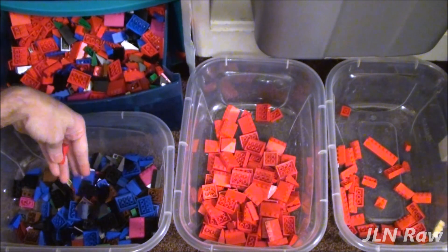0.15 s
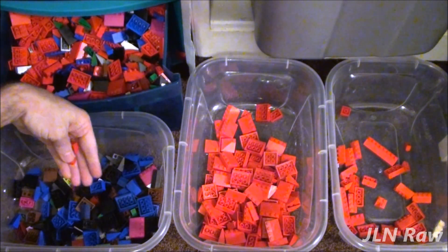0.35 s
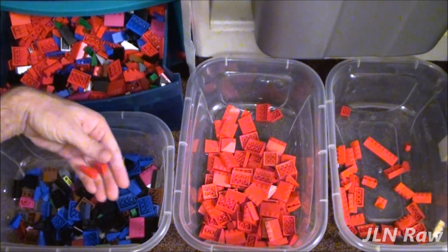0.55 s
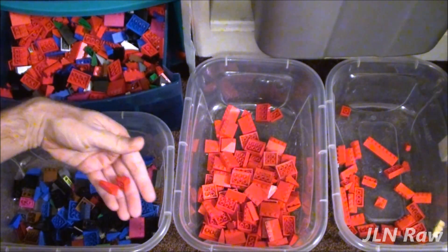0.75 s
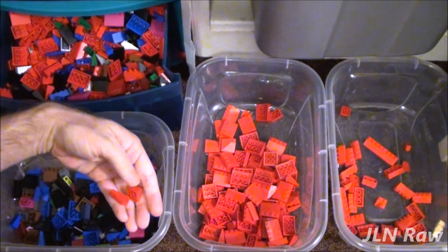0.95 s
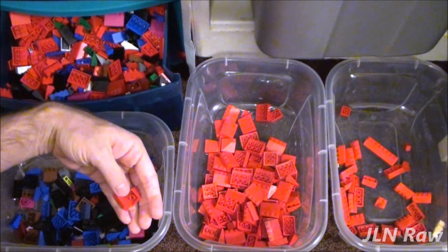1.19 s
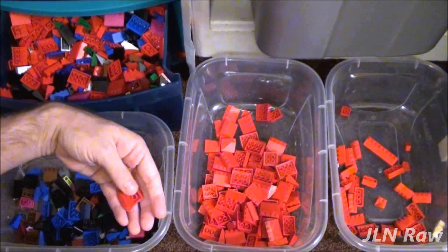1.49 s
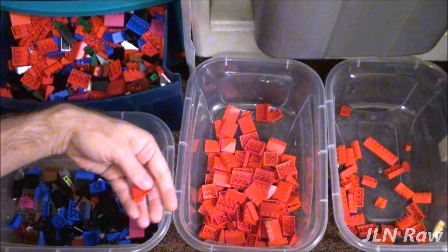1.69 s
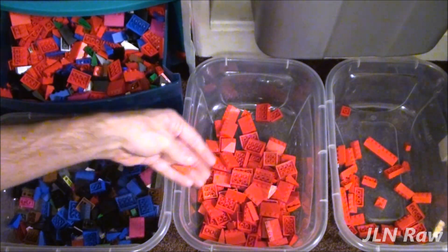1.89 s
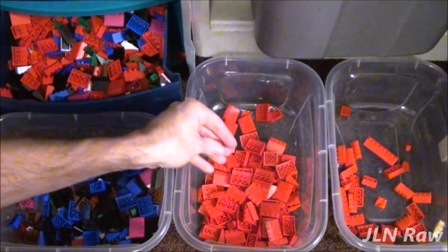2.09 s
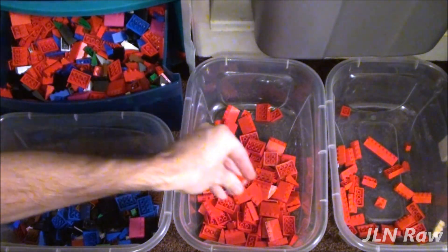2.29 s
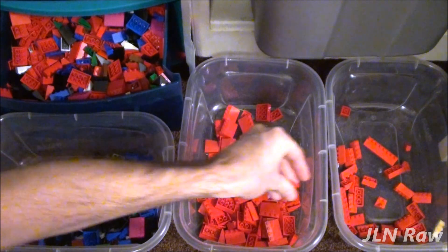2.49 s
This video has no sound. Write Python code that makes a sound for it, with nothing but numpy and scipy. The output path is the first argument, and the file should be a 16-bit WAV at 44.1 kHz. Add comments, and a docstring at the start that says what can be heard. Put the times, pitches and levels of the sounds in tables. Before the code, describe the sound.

After a brief rub and tick of held bricks, a few clack into a hollow bin; sparse finger ticks follow, then another handful patters down and a dry click ends it, heard closely indoors over low hum.

```python
"""Small plastic bricks are sorted by hand into thin plastic bins in a quiet room, over steady hum, whine and hiss.
First held bricks rub and tick with damped rings; then a few fall on a shallow heap, and ticks in the hand follow.
Later the rest drop on a deeper heap in the next bin; a dry click sounds as the hand lifts, then a last rub and tick.
Each falling contact cracks as noise, rings brick modes, drums the bin and jostles three neighbours in the heap."""
import sys
import numpy as np
from scipy import signal
from scipy.fft import rfft, irfft, next_fast_len
from scipy.io import wavfile
from scipy.ndimage import uniform_filter1d

SR = 44100
rng = np.random.default_rng(int(sys.argv[2]) if len(sys.argv) > 2 else 0)


def transcribe(signal):
    """Save signal, clipped to [-1, 1], as a 16-bit WAV file at the path in sys.argv[1]."""
    frames = np.atleast_2d(signal).T
    limited = np.clip(frames, -1, 1)
    pcm = np.round(limited * 32767).astype(np.int16)
    wavfile.write(sys.argv[1], SR, pcm)


N = 116865
TIME = np.arange(N) / SR
SHORT = TIME[:SR // 5]   # time axis of one contact, s


def amp(db):
    """Level to gain: 20 dB is a factor of ten in amplitude."""
    return 10 ** (np.asarray(db) / 20)


def at_hz(points, hz):
    """Logarithmic frequency scale: interpolate a table along it."""
    f, value = np.transpose(points)
    return np.interp(np.log(np.maximum(hz, 1)), np.log(f), value)


def colour(x, points):
    """Minimum-phase filtering: a causal filter of given spectrum that keeps the power of white noise."""
    size = 2 * next_fast_len(N)
    gain = amp(at_hz(points, np.linspace(0, SR / 2, size // 2 + 1)))
    unit_power_gain = gain / np.sqrt(np.mean(gain ** 2))
    # Folding the cepstrum onto positive time makes the filter causal
    cepstrum = irfft(np.log(unit_power_gain))
    cepstrum[1:size // 2] *= 2
    cepstrum[size // 2 + 1:] = 0
    response = np.exp(rfft(cepstrum))
    return irfft(rfft(x, size) * response)[..., :N]


def filtered(x, order, hz, kind):
    """Butterworth filtering: a maximally flat pass band."""
    return signal.sosfilt(signal.butter(order, hz, kind, fs=SR, output="sos"), x)


def add(track, s, sound):
    """Superposition: mix a sound in at a time."""
    i = int(np.clip(s * SR, 0, N - 1))
    track[i:i + len(sound)] += sound[:N - i]


def fade(t60, t=SHORT):
    """Exponential damping: the level falls 60 dB in t60."""
    return np.exp(-np.log(1000) * t / t60)


def ring(hz, t60):
    """Free vibration: one struck mode decays at its own frequency."""
    return np.sin(2 * np.pi * hz * SHORT) * fade(t60)


def burst(t60):
    """High modal density: many close modes dying together act as decaying noise."""
    return rng.standard_normal(len(SHORT)) * fade(t60)


def wall_scatter(x):
    """Multiple reflection: quick echoes between the bin walls, of unit energy."""
    echoes = burst(0.052)
    return signal.fftconvolve(x, echoes / np.sqrt(np.sum(echoes ** 2)))[:N]


def spread(mid, side):
    """Sum and difference stereo: left and right from middle and side."""
    return np.array([mid + side, mid - side])


# Spectral envelope of room rumble and hiss: (f/Hz, relative level/dB)
FLOOR_SPECTRUM = [(15, -44), (25, -20), (43, -16.5), (91, -3.5), (104, -20.5), (122, -12), (209, -7.5),
                  (246, -14.5), (267, -11.5), (297, -13.5), (552, -17), (5140, -24), (5580, -22),
                  (6550, -23.5), (15500, -27)]
# Steady tones of the hum and thin whine: (f/Hz, rms level/dB)
HUM_TONES = [(120, -53.5), (146, -57), (241, -61.5), (8392, -66.5)]
FLOOR_DB, FLOOR_WIDTH = -49.5, 0.72   # noise rms level, side gain
HISS_WIDE_HZ = 255   # the rumble below this comes mostly from the centre


def background():
    """Stationary noise and pure tones: room rumble, hiss, mains hum and a thin steady whine."""
    mid, side = amp(FLOOR_DB) * colour(rng.standard_normal((2, N)), FLOOR_SPECTRUM)
    hum = np.zeros(N)
    for hz, db in HUM_TONES:
        phase = 2 * np.pi * (hz * TIME + rng.random())
        hum += amp(db) * np.sqrt(2) * np.sin(phase)
    side = filtered(side, 1, HISS_WIDE_HZ, "high")
    return spread(mid + hum, FLOOR_WIDTH * side)


# Bricks rub in the fingers: (start t/s, end t/s, level before scatter and colour/dB)
RUBBING_SPELLS = [(0, 0.032, -45), (1.72, 2.168, -57), (2.613, 2.65, -52)]
# Spectral envelope of held bricks, rubbing or ticking: (f/Hz, relative level/dB)
HELD_SPECTRUM = [(300, -31), (1400, -22), (2400, -3.5), (3400, -3.5), (4600, 2), (6300, -1), (8000, -4),
                 (11000, -14.5), (16000, -19)]
RUBS_PER_S = 290   # mean rate of slips


def fumbling():
    """Stick-slip friction: tiny random slips as the fingers shift the bricks."""
    chance = RUBS_PER_S / SR
    slips = (rng.random(N) < chance) * rng.standard_normal(N) / np.sqrt(chance)   # unit mean power
    effort = np.zeros(N)
    for start, end, db in RUBBING_SPELLS:
        effort += amp(db) * ((TIME > start) & (TIME < end))
    return colour(wall_scatter(slips * effort), HELD_SPECTRUM)


# Bricks touching in the hand: (t/s, level/dB, ring f/Hz, ring level relative to contact/dB)
PALM_TICKS = [(.001, -34, 5500, 0.5), (0.0225, -30.5, 5360, -6.5), (.0527, -30, 10330, -2.5),
              (0.0528, -31, 4200, -2), (0.5596, -32, 5570, -7), (0.606, -36.5, 5580, 3),
              (1.123, -36, 5570, -1.5), (1.1584, -46, 5600, 7.5), (1.3275, -39.5, 4600, -9),
              (1.4923, -42.5, 5580, 18), (1.6018, -41, 5650, 0.5), (1.7453, -37, 4800, -13),
              (1.776, -39.5, 4800, -5), (1.982, -33, 5830, -11), (2.616, -42, 3900, 0)]
HAND_CRACK_DB, HAND_CRACK_T60_S, HAND_RING_T60_S = -4.5, 0.019, 0.028


def hand():
    """Damping by the fingers: held bricks tick with a short ring."""
    cracks, rings = np.zeros(N), np.zeros(N)
    for s, db, hz, ring_db in PALM_TICKS:
        add(cracks, s, amp(db + HAND_CRACK_DB) * burst(HAND_CRACK_T60_S))
        add(rings, s, amp(db + ring_db) * ring(hz, HAND_RING_T60_S))
    return colour(cracks, HELD_SPECTRUM) + rings


# Hold/s of a contact at 0 dB; exponent by which the hold follows contact strength
CHATTER_S, CHATTER_FOLLOWS = 0.0036, 0.34


def chatter(t60, db):
    """Repeated contact: hold while the brick buzzes on its neighbour, longer if hit harder, then decay."""
    hold = CHATTER_S * amp(CHATTER_FOLLOWS * db)
    return fade(t60, np.maximum(SHORT - hold, 0))


# A brick strikes the floor or wall of the bin directly: (t/s, level before the drop gain/dB, f/Hz)
BIN_KNOCKS = [(0.2416, -23, 438), (0.2530, -20.5, 425), (.3050, -24.5, 369), (.3200, -18.5, 407),
              (0.359, -20.5, 1420), (0.393, -19.5, 1453), (2.2796, -30, 508), (2.329, -31, 312)]
KNOCK_T60_S = 0.061


def knocks():
    """Plate vibration: the thin floor or wall of the bin gives one hollow note when hit directly."""
    out = np.zeros(N)
    for s, db, hz in BIN_KNOCKS:
        add(out, s, amp(db) * np.sin(2 * np.pi * hz * SHORT) * chatter(KNOCK_T60_S, db))
    return out


def grit():
    """Intermittent impact: a contact is a run of tiny uneven impacts, of rms 1 before decay."""
    noise = rng.standard_normal(len(SHORT))
    impacts = noise * np.abs(noise)
    return impacts / impacts.std()


TWIN_DB, TWIN_SPREAD = -8, .05   # second mode: relative level, standard deviation as a share of pitch


def brick_ring(hz):
    """Beating: two close modes of a brick sound against each other."""
    phase = 2 * np.pi * hz * SHORT
    detune = 1 + TWIN_SPREAD * rng.standard_normal()
    twin = amp(TWIN_DB) * np.sin(phase * detune + 2 * np.pi * rng.random())
    return np.sin(phase) + twin


MODE_DETUNE, MODE_SCATTER_DB = .028, 4.5   # spread from contact to contact: share of pitch, level


def struck(times, levels_db, modes):
    """Modal superposition: each contact excites each mode with its own strength, sign and slight detuning."""
    out = np.zeros(N)
    hz, mode_db, t60 = np.transpose(modes)
    decays = fade(t60[:, None])
    for s, db in zip(times, levels_db):
        strength, sign, detune = rng.standard_normal((3, len(modes)))
        mode_hz = hz * (1 + MODE_DETUNE * detune)
        shapes = np.sin(2 * np.pi * np.outer(mode_hz, SHORT)) * decays
        gains = amp(db + mode_db + MODE_SCATTER_DB * strength) * np.sign(sign)
        add(out, s, gains @ shapes)
    return out


# Spectral envelope of the contact noise: (f/Hz, relative level/dB)
CRACK_SPECTRUM = [(300, -29), (2000, -19.5), (3700, -6), (5500, -4), (7000, 2.5), (9000, -6),
                  (10500, -12.5), (13000, -13.5), (16000, -35)]
# Spectral envelope of the bin's drumming noise: (f/Hz, relative level/dB)
DRUM_SPECTRUM = [(100, -10), (210, -12), (320, -8.5), (480, 3.5), (680, -4), (950, 3), (1250, -4.5),
                 (2200, 2.5), (3500, -5.5), (6000, -9.5), (14000, -22.5)]
CRACK_DB, CRACK_T60_S, RING_DB, RING_T60_S = -5.5, 0.032, -3, 0.025
DRUM_DB, DRUM_T60_S = -0.5, 0.039
# Neighbours knocked by each contact: mean delay/s, mean loss/dB, spread of loss/dB
JOSTLE_DELAY_S, JOSTLE_LOSS_DB, JOSTLE_SCATTER_DB = 0.027, 21, 3
# Range of neighbour pitch/Hz and extra level of the neighbour's ring/dB
JOSTLE_LOW_HZ, JOSTLE_HIGH_HZ, JOSTLE_RING_DB = 4870, 8750, 4
DROP_DB = 3.5   # drop gain on heaps, bins and knocks


def clatter(hits, brick_modes, bin_modes):
    """Impact excitation: bricks landing on a heap knock neighbours and drive the bin; returns bricks and bin."""
    cracks, rings, drums = np.zeros(N), np.zeros(N), np.zeros(N)
    for s, db, hz, bin_db in hits:
        add(cracks, s, amp(db + CRACK_DB) * grit() * chatter(CRACK_T60_S, db))
        add(rings, s, amp(db + RING_DB) * brick_ring(hz) * chatter(RING_T60_S, db))
        add(drums, s, amp(db + bin_db + DRUM_DB) * grit() * chatter(DRUM_T60_S, db))
        for wait, smallness in rng.random(size=(3, 2)):
            later = s + 2 * JOSTLE_DELAY_S * wait
            weaker = db - JOSTLE_LOSS_DB + JOSTLE_SCATTER_DB * rng.standard_normal()
            neighbour_hz = JOSTLE_LOW_HZ + smallness * (JOSTLE_HIGH_HZ - JOSTLE_LOW_HZ)
            add(cracks, later, amp(weaker) * burst(CRACK_T60_S / 2))
            add(rings, later, amp(weaker + JOSTLE_RING_DB) * ring(neighbour_hz, RING_T60_S))
    times, db, _, bin_db = np.transpose(hits)
    bricks = colour(cracks, CRACK_SPECTRUM) + rings + struck(times, db, brick_modes)
    bin_body = colour(drums, DRUM_SPECTRUM) + struck(times, db + bin_db, bin_modes)
    return amp(DROP_DB) * np.array([bricks, bin_body])


# Contacts: (t/s, level before the drop gain/dB, brick ring f/Hz, bin level relative to contact/dB)
SHALLOW_CONTACTS = [(.2417, -8, 6910, -7), (.2465, -12.5, 4360, -9), (.2538, -6.5, 5500, -2.5),
                    (.2590, -9.5, 6100, -5), (.2653, -5.5, 5740, -34), (.2748, -5.5, 5700, -20),
                    (.2845, -13, 5630, -11.5), (.3017, -10, 7230, -9), (.3068, -9, 6500, -3.5),
                    (.3202, -6, 5860, -9), (.3235, -6, 6336, -11), (.3335, -14, 7120, -12),
                    (.3410, -16, 6210, -7), (.3480, -13.5, 6100, -10), (.3545, -14, 6140, -5.5),
                    (.3615, -14, 5630, -4), (.3690, -10, 5490, -9), (.3765, -17, 5740, -4.5),
                    (.3810, -9, 7000, -16), (.3830, -11, 4400, -14.5), (.3920, -17.5, 5700, -6.5),
                    (.3990, -24, 5400, 0), (.4140, -23, 5420, -6), (.4230, -32.5, 6100, 4.5),
                    (.4320, -37, 5250, 5), (.4420, -51, 4430, -8)]
# Modes of the bricks in the heap: (mean f/Hz, relative level/dB, t60/s)
SHALLOW_BRICK_MODES = [(4470, -21.5, 0.18), (5440, -20, 0.14), (6124, -13, 0.079), (5980, -35, 0.065),
                       (7900, -36, 0.028), (8300, -13, 0.035), (9100, -16, 0.066), (9970, -16, 0.055),
                       (10500, -13.5, 0.028)]
# Wall and floor modes of the bin: (mean f/Hz, relative level/dB, t60/s)
SHALLOW_BIN_MODES = [(375, -16.5, 0.047), (435.6, -11.5, 0.066), (522, -14.5, 0.031), (830, -13.5, 0.053),
                     (1131, -10.5, 0.048), (1407, -6, 0.063), (2190, -12, 0.02), (2965, -13.5, 0.063)]


def shallow_drop():
    """Modal radiation of the shallow heap and its bin under the first falling bricks."""
    return clatter(SHALLOW_CONTACTS, SHALLOW_BRICK_MODES, SHALLOW_BIN_MODES)


# Contacts: (t/s, level before the drop gain/dB, brick ring f/Hz, bin level relative to contact/dB)
DEEP_CONTACTS = [(2.1887, -12, 7100, -13), (2.1979, -5, 7060, -13), (2.2032, -9, 7060, -16),
                 (2.2124, -12, 8930, -6), (2.2225, -16, 6200, -5), (2.2305, -16, 4650, -0.5),
                 (2.2380, -18.5, 6360, -0.5), (2.2490, -21, 7000, 1), (2.2620, -24, 4660, 2.5),
                 (2.2796, -14.5, 5090, -1), (2.3010, -18, 7050, -20), (2.3101, -13, 7120, -12.5),
                 (2.3177, -10, 6070, -16.5), (2.3180, -12.5, 9000, -9.5), (2.3300, -27, 9100, 4.5),
                 (2.3410, -29, 6000, 4), (2.3532, -19, 7080, -20), (2.3797, -24, 8540, -4),
                 (2.3912, -27.5, 8820, -7), (2.4015, -38, 8830, 0.5), (2.4055, -33, 8700, -11),
                 (2.4486, -26.5, 8780, -6.5), (2.4770, -32.5, 8800, -8.5), (2.4935, -46, 8850, -5),
                 (2.5050, -42, 9040, 0)]
# Modes of the bricks in the heap: (mean f/Hz, relative level/dB, t60/s)
DEEP_BRICK_MODES = [(4624, -9.5, 0.029), (5150, -11, 0.022), (6080, -12, 0.029), (6610, -9, 0.036),
                    (7170, -8.5, 0.025), (7590, -5, 0.0083), (8100, -7, 0.019), (8840, -22, 0.14),
                    (10960, -18, .035)]
# Wall and floor modes of the bin: (mean f/Hz, relative level/dB, t60/s)
DEEP_BIN_MODES = [(535, -10.5, 0.021), (960, -13, 0.037), (1165, -12, .05), (1501, -4.5, 0.034),
                  (1810, -3, 0.012), (2810, -10.5, 0.029)]


def deep_drop():
    """Modal radiation of the deeper heap and its bin under the remaining bricks."""
    return clatter(DEEP_CONTACTS, DEEP_BRICK_MODES, DEEP_BIN_MODES)


SNAP_S, SNAP_DB, SNAP_LOW_HZ, SNAP_HIGH_HZ = 2.5608, -1, 1300, 6500   # impulse level before the band filter
SNAP_ECHO_DB, SNAP_ECHO_DELAY_S = -6, 0.002


def snap():
    """Impulse response: one band-limited click as the hand lifts, with scattered echoes just after."""
    impulse = np.zeros(N) + 1e-18   # tiny offset keeps the filter out of denormal numbers
    add(impulse, SNAP_S, amp([SNAP_DB]))
    click = filtered(impulse, 2, [SNAP_LOW_HZ, SNAP_HIGH_HZ], "band")
    echo = np.roll(wall_scatter(click), int(SNAP_ECHO_DELAY_S * SR))
    return click + amp(SNAP_ECHO_DB) * echo


BRICK_WIDTH = 0.26   # side gain


def placed(x, pan_db):
    """Level-difference localisation: a source close in front, left raised and right lowered by pan_db."""
    return spread(x, BRICK_WIDTH * wall_scatter(x)) * amp([[pan_db], [-pan_db]])


# Spectral envelope of the reverberation: (f/Hz, relative level/dB)
ROOM_SPECTRUM = [(100, -42.5), (400, 2.5), (1500, 3), (3000, 6.5), (6000, 0), (9000, -4), (15000, -0.5)]
# Reverberation time: (f/Hz, t60/s)
ROOM_DECAY = [(200, 0.3), (2000, 0.23), (6000, 0.22), (14000, 0.21)]
ROOM_DB, ROOM_DELAY_S, ROOM_WIDTH = -12.5, .009, 0.27


def room(x):
    """Diffuse reverberation: a short noise-like tail whose treble dies first."""
    t = TIME[:SR * 2 // 3]
    edges = np.geomspace(100, 17000, 9)   # band edges, Hz
    tail = 0
    for low, high in zip(edges, edges[1:]):
        band = filtered(rng.standard_normal((2, len(t))), 2, [low, high], "band")
        decay = fade(at_hz(ROOM_DECAY, np.sqrt(low * high)), t)
        tail = tail + band * decay * (t > ROOM_DELAY_S)
    tail = tail / np.sqrt(np.sum(tail ** 2) / 2)
    reverberant = signal.fftconvolve(x[None], tail, axes=1)[:, :N]
    mid, side = colour(reverberant, ROOM_SPECTRUM)
    return amp(ROOM_DB) * spread(mid, ROOM_WIDTH * side)


BIN_LOW_HZ = 243   # corner below which radiation falls away steeply


def low_cut(x):
    """Inefficient radiation: small light bodies give little bass."""
    return filtered(x + 1e-18, 4, BIN_LOW_HZ, "high")


IMAGE_TOP_HZ = 8600   # the stereo image narrows above this


def narrowed(x):
    """Interchannel coherence: low-passing the difference draws the highest treble to the centre."""
    sos = signal.butter(1, IMAGE_TOP_HZ, fs=SR, output="sos")
    return spread(x.mean(axis=0), signal.sosfiltfilt(sos, (x[0] - x[1]) / 2))


SHALLOW_PAN_DB, DEEP_PAN_DB = 2, 0.5
HAND_ROOM_DB = -13   # the fingers shield their bricks from the room


def scene():
    """Direct and reverberant fields: the handling and both handfuls, in the room."""
    noise_floor = background()
    held = fumbling() + hand()
    bin_notes = amp(DROP_DB) * knocks()
    shallow, shallow_bin = shallow_drop()
    deep, deep_bin = deep_drop()
    click = snap()
    near = placed(shallow, SHALLOW_PAN_DB) + placed(deep + click + held, DEEP_PAN_DB)
    near = near + shallow_bin + deep_bin + bin_notes
    far = room(shallow + shallow_bin + deep + deep_bin + click + amp(HAND_ROOM_DB) * held)
    return narrowed(low_cut(near + far) + noise_floor)


LIMIT_DB, RELEASE_DB_PER_S, LIMIT_WINDOW_S = -9.5, 16, 0.0036
CEILING, CUTOFF_HZ = 1.15, 15750   # saturation amplitude, top of the pass band


def record(dry):
    """Gain limiting: loud contacts duck the level, which recovers slowly; peaks round and the top is cut."""
    power = uniform_filter1d(dry.mean(axis=0) ** 2, max(int(LIMIT_WINDOW_S * SR), 1))
    over = np.maximum(10 * np.log10(np.abs(power) + 1e-12) - LIMIT_DB, 0)
    # A running maximum on a rising ramp gives instant attack and linear release in dB
    release = RELEASE_DB_PER_S * TIME
    duck = np.maximum.accumulate(over + release) - release
    rounded = CEILING * np.tanh(dry * amp(-duck) / CEILING)
    return signal.sosfilt(signal.ellip(10, .1, 70, CUTOFF_HZ, fs=SR, output="sos"), rounded)


dry = scene()
out = record(dry)
transcribe(out)
```